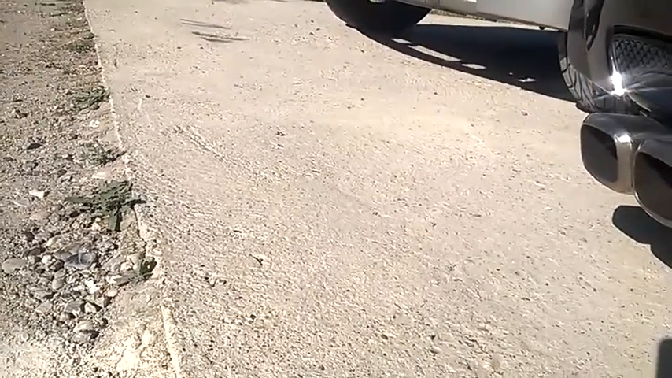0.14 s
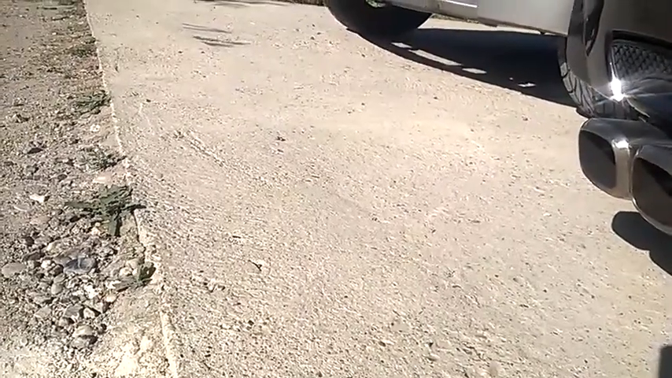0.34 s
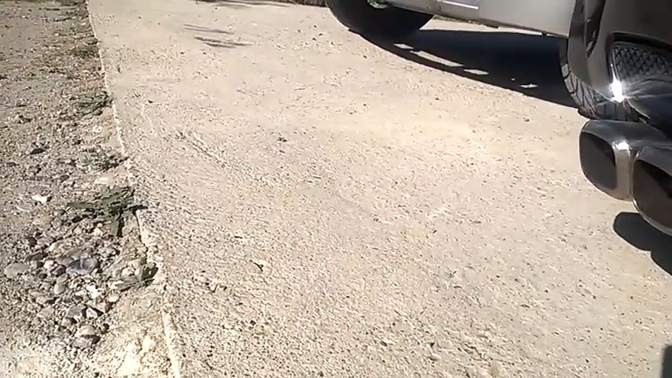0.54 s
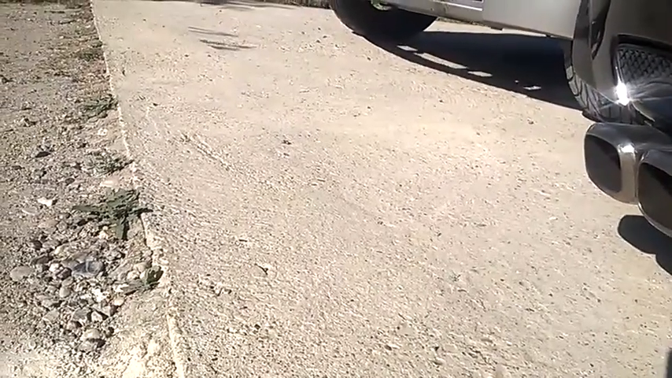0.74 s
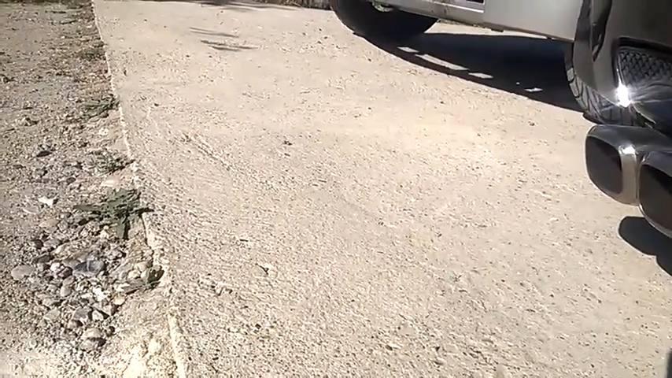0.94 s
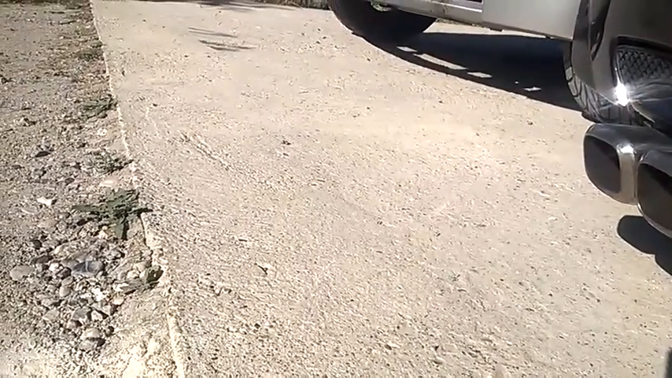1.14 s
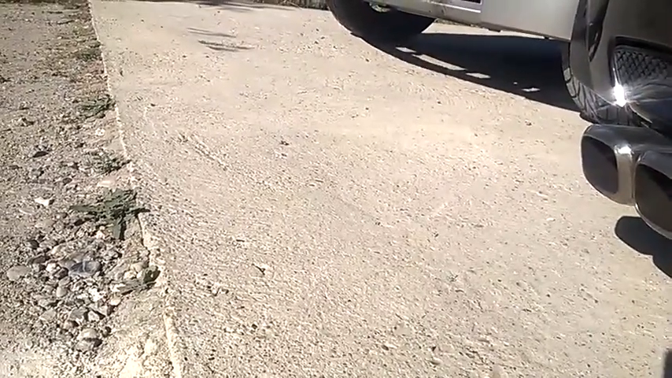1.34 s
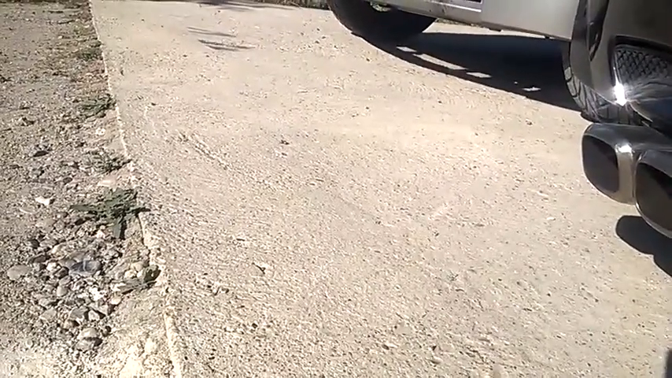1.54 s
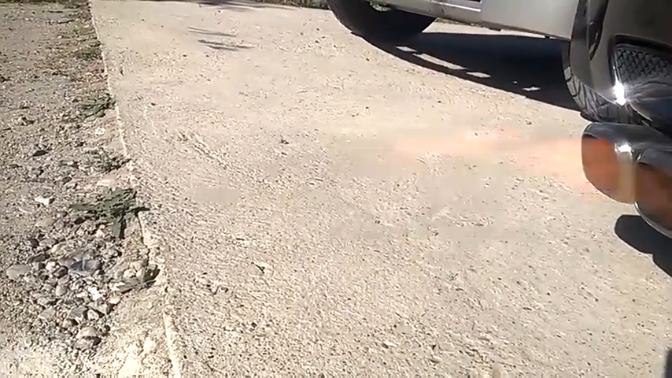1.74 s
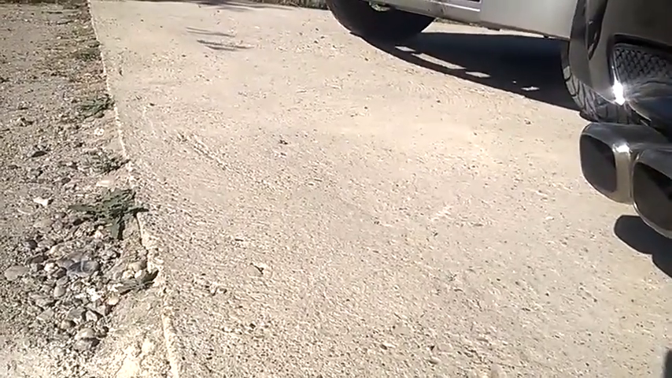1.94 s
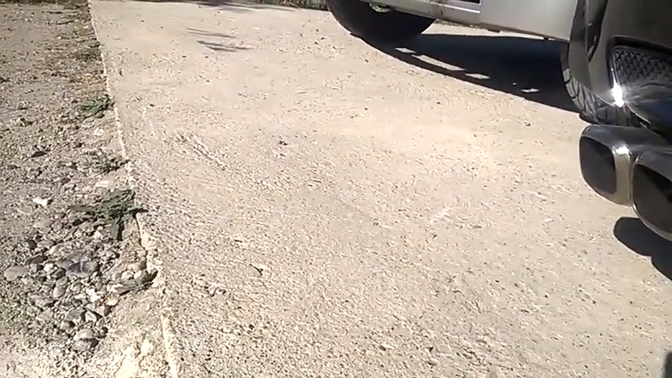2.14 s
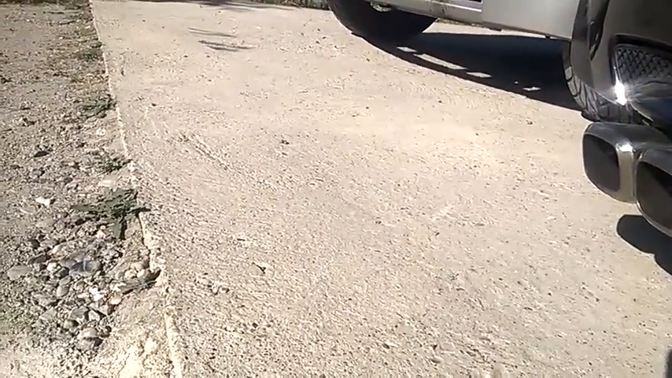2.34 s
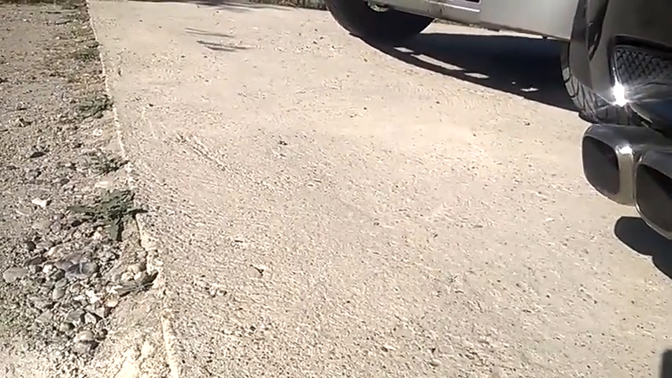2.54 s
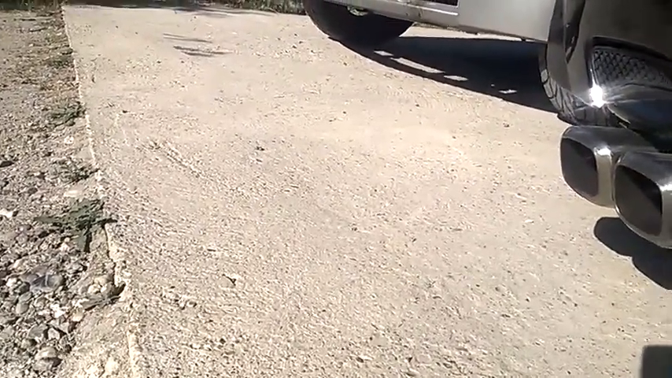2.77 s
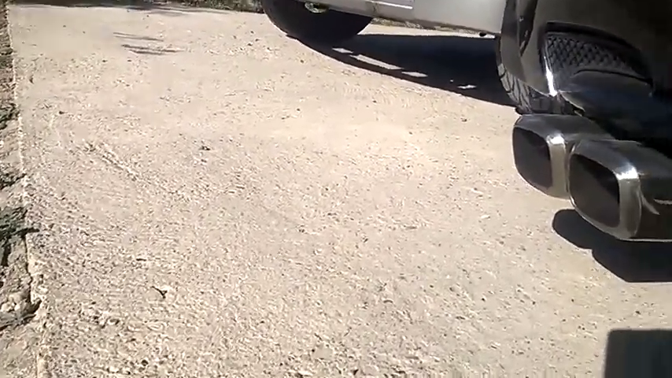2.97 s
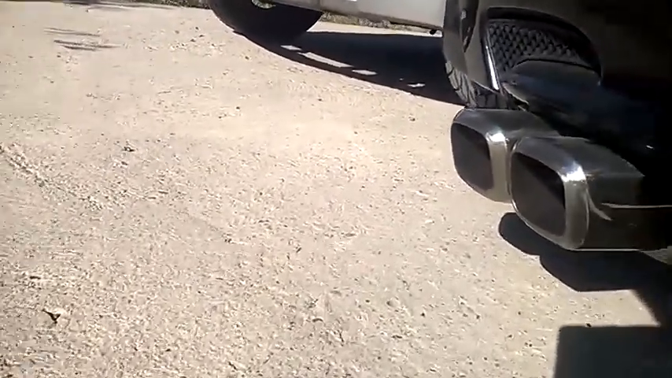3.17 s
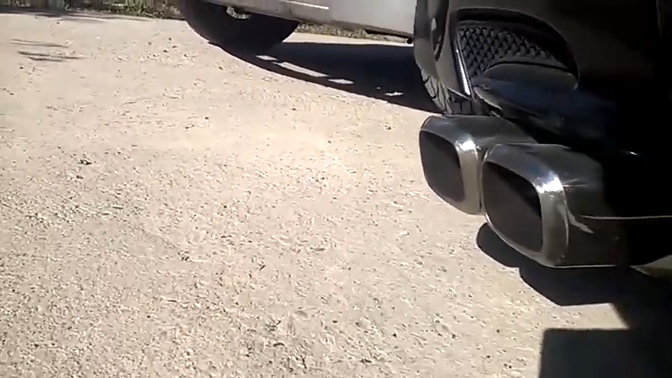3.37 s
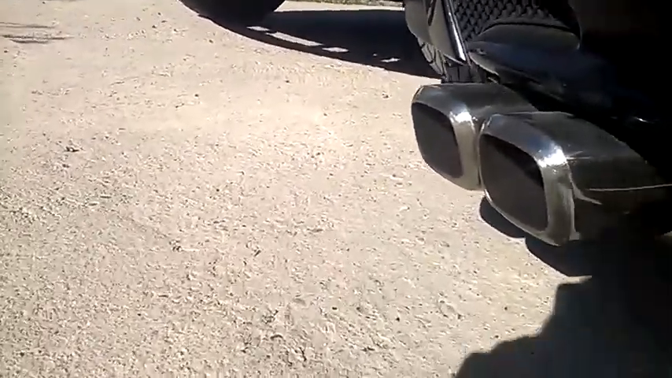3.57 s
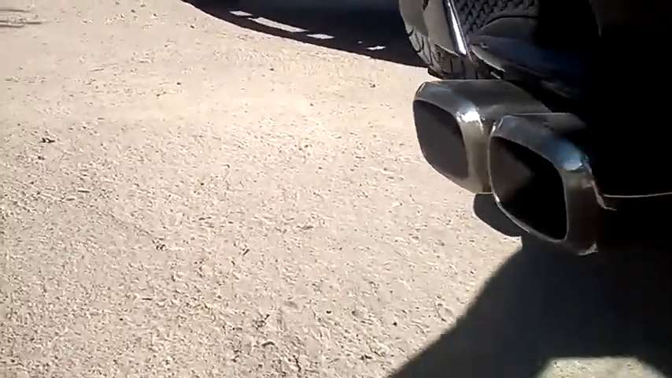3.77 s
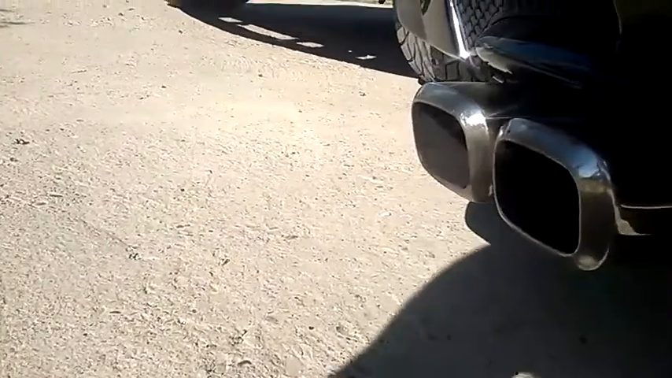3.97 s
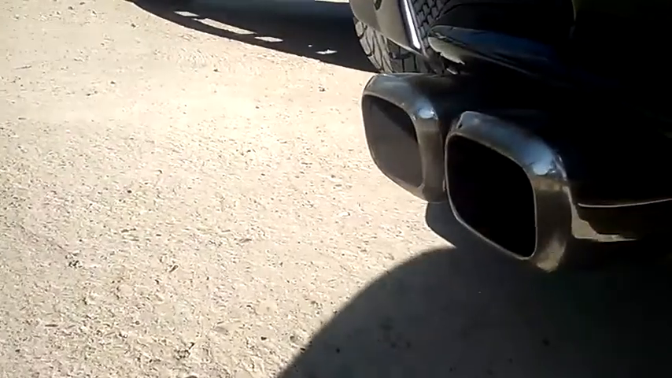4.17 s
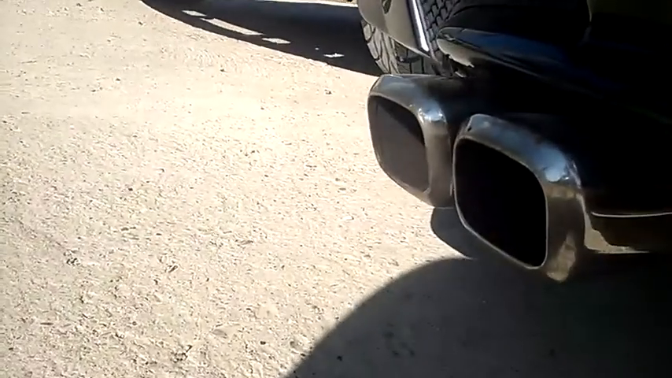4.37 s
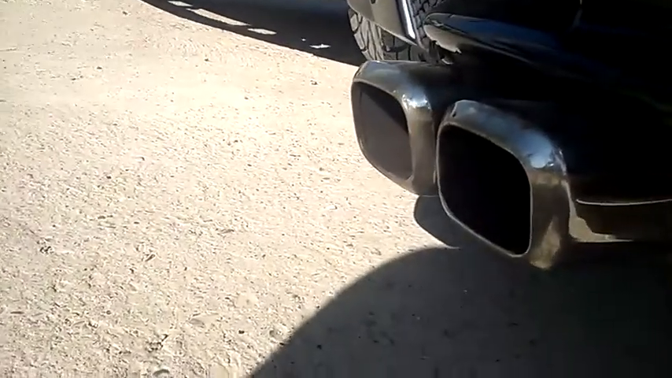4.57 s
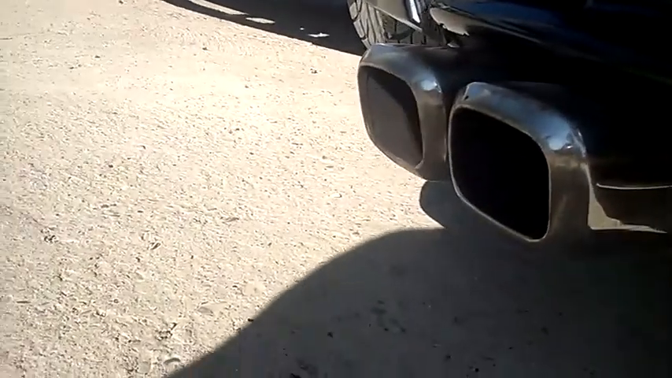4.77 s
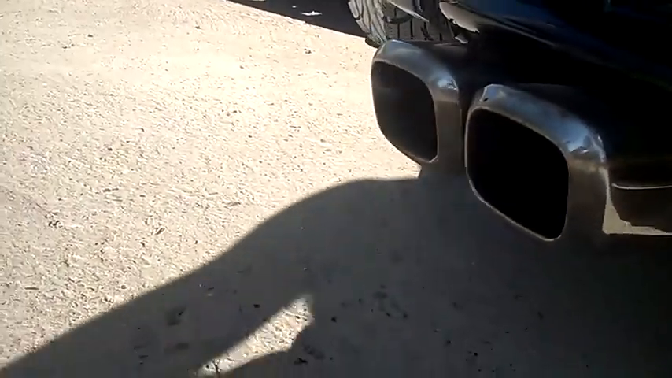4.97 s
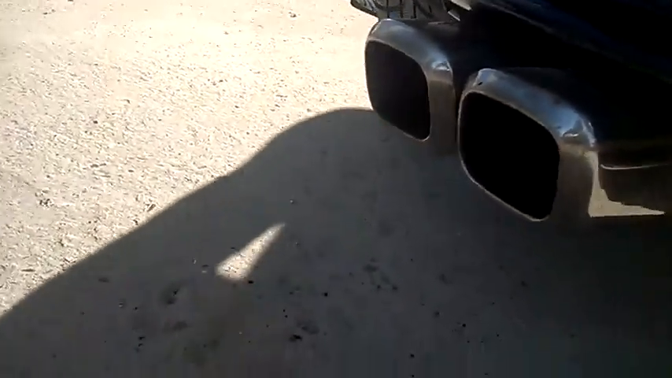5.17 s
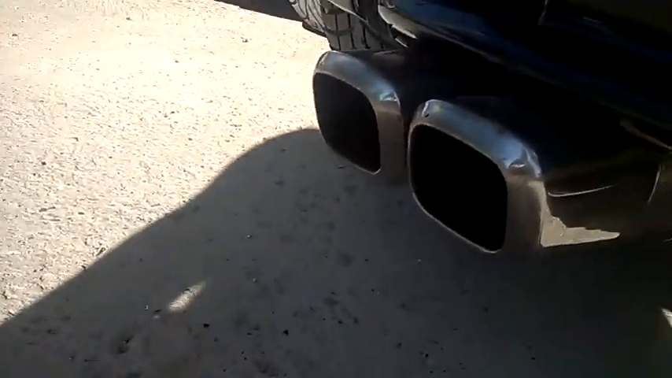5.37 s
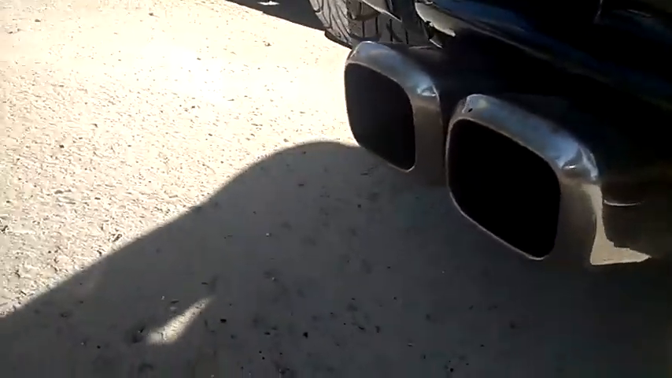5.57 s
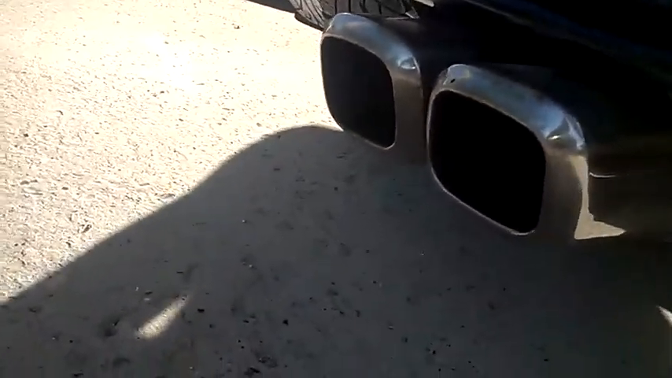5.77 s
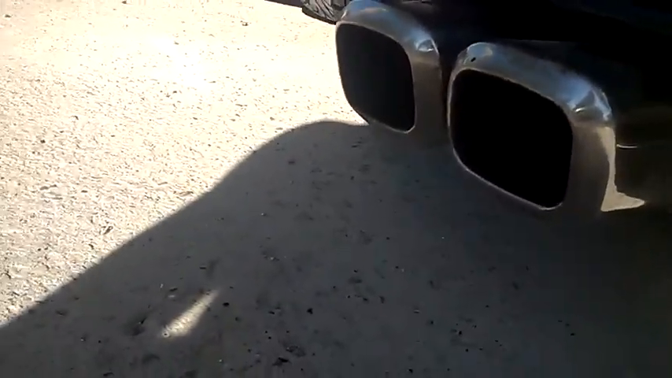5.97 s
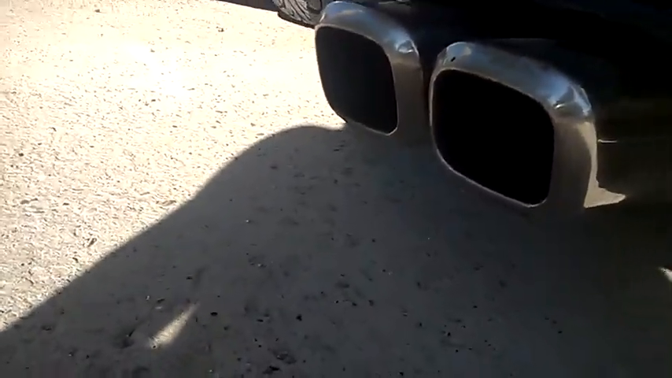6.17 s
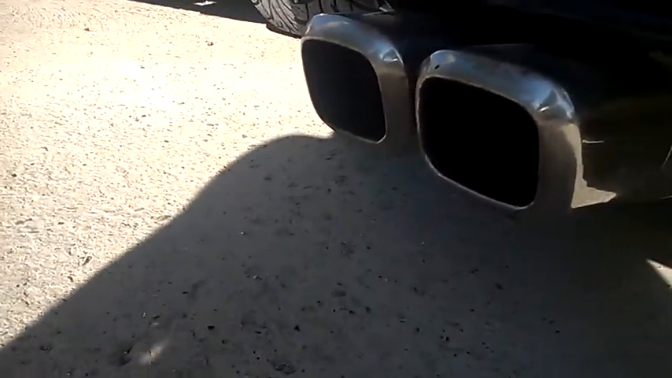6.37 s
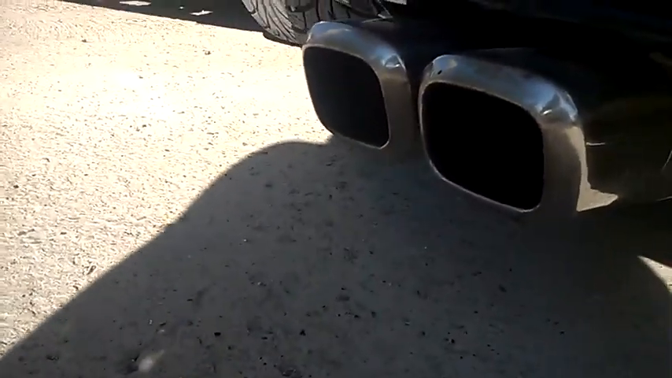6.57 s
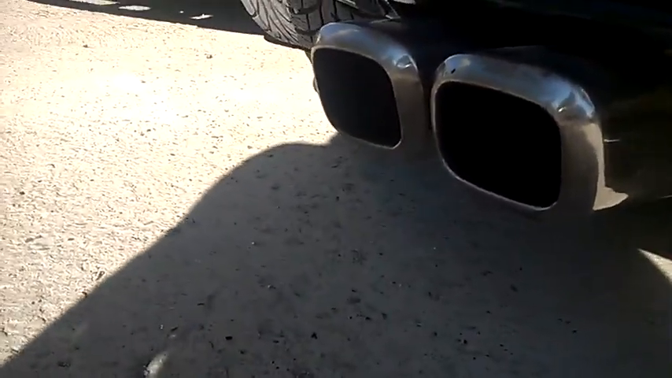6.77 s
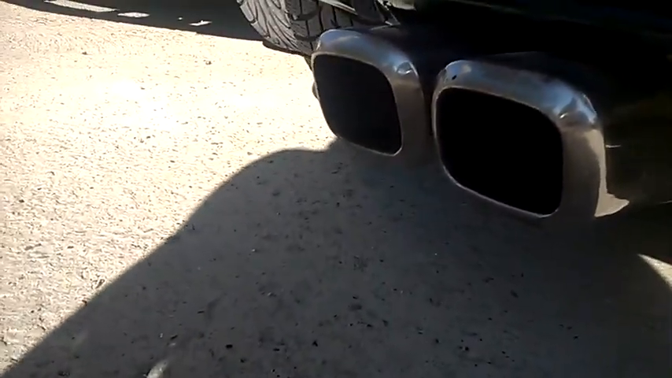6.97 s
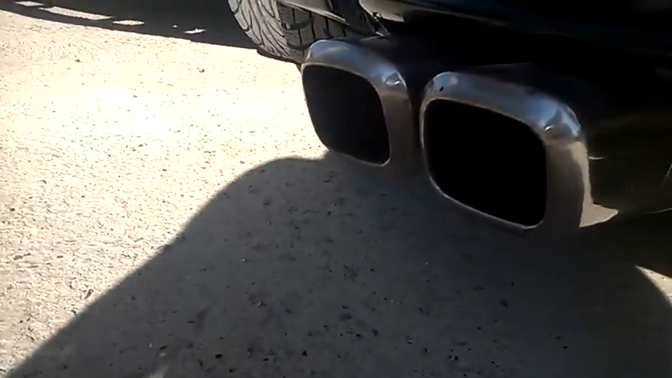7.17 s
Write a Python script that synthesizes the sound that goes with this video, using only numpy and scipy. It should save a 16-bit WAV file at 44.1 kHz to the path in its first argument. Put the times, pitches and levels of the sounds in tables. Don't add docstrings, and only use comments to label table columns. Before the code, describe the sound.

A petrol engine is blipped three times close to its twin tailpipe outdoors, each rev barking, falling away and ending in a sharp backfire pop.

```python
import sys
import numpy as np
from scipy import signal
from scipy.fft import rfft, irfft, next_fast_len
from scipy.io import wavfile
from scipy.ndimage import map_coordinates

SR = 44100
rng = np.random.default_rng(int(sys.argv[2]) if len(sys.argv) > 2 else 0)


def master_out(mix):
    frames = np.transpose(np.atleast_2d(mix))
    ceiling = np.clip(frames, -1, 1)
    pcm = np.round(ceiling * 32767).astype(np.int16)
    wavfile.write(sys.argv[1], SR, pcm)


def makeup_ratio(level_db):
    decades = np.asarray(level_db, float) / 20
    return 10 ** decades


N = 317961
TIME = np.arange(N) / SR

# opens_s, fuel_cut_s
BLIPS = [
    (-.3, .246),
    (2.467, 2.988),
    (4.895, 5.51),
]
# time_s, firing_hz
REVS = [
    [(0, 95.6), (.2, 138.3), (.25, 140.2), (.46, 127.6), (.7, 109.8), (1.04, 86.5), (1.59, 59.52),
     (1.76, 45.7), (2.49, 36.2)],
    [(2.57, 47.9), (2.82, 95.8), (2.97, 130.5), (3.03, 122.9), (3.39, 102.2), (3.63, 85.27), (4.08, 60.5),
     (4.4, 46.34), (4.86, 35.1)],
    [(4.93, 38.61), (5.2, 86.76), (5.39, 133.2), (5.5, 146), (5.7, 135.5), (5.9, 119.7), (6.4, 88.6),
     (6.95, 58.36), (7.15, 47.9)],
]
# combustion_db, idle_firing_db, pumping_db, pipe_snap_db, jet_db
EFFORT = [
    (-.5, -1, -3, 0, -3),
    (-1.1, 3, -0.17, -12, -7),
    (2.5, 2, 1, 1, 0.5),
]
# time_s, strength_db
STRAY_FIRINGS = [(.426, -16.5), (0.456, -18.5), (1.692, -45), (1.769, -32.5), (1.812, -27), (1.935, -35),
                 (2.026, -45.5), (2.122, -39.5), (2.221, -38.5), (2.328, -40.5), (2.435, -39),
                 (3.128, -15.5), (3.163, -18.5), (4.278, -30.5), (4.397, -40), (4.485, -34), (4.575, -36.5),
                 (4.672, -34), (4.77, -35.5), (4.877, -33.5), (4.922, -51), (5.679, -16), (5.710, -15),
                 (7.015, -33), (7.112, -32.5), (7.159, -24)]
FIRST_KICKS = [2.505, 2.551, 2.590, 2.659, 2.741, 4.943, 4.988, 5.009]
OPEN_S, CUT_S = 0.058, 0.041
PLATE_LAG_S, PLATE_S = 0.063, 0.05
PUMP_LEAD_S, PUMP_RISE_S, PUMP_LOADED_DB = 0.076, 0.092, -28.5
FLOW_LEAD_S, FLOW_FALL_S = 0.042, 0.04
SNAP_GAP_S, SNAP_GAP_DB = 0.015, -23.5
STRAY_MUTE_S, STRAY_MUTE_DB = 0.017, -7
GASP_S, GASP_DB = 0.032, 7

# firing_hz, level_db
FIRE_LOADED = [(38, -19), (50, -19), (65, -14.5), (90, -11), (115, -10), (140, -14)]
# firing_hz, level_db
FIRE_IDLE = [(35, -45), (42, -41), (50, -36.5), (58, -33), (66, -40), (140, -50.5)]
# firing_hz, level_db
PUMPING = [(38, -31.5), (47, -23.5), (55, -19), (61, -10.5), (72, -13.5), (88, -12.5), (110, -9),
           (128, -10.5), (142, -5.5)]
# firing_hz, level_db
BAY_COASTING = [(35, -56.5), (45, -53), (60, -50.5), (85, -45), (110, -39.5), (140, -36.5)]
# firing_hz, level_db
BAY_LOADED = [(35, -53), (55, -42), (85, -36.5), (115, -30), (140, -29)]
# firing_hz, level_db
SNAPPING = [(55, -69), (63, -45), (70, -60), (104, -64), (114, -39.5), (121, -21.5), (142, -19)]
# firing_hz, level_db
JET_LOADED = [(38, -56.5), (50, -50.5), (75, -38.5), (100, -21.5), (140, -21.5)]
# firing_hz, level_db
JET_COASTING = [(60, -65), (95, -64), (112, -49.5), (126, -36.5), (142, -38)]

# pitch_hz, level_db per Hz
BAY_HISS = [(350, -9), (600, 2.5), (907, -8.5), (991, -3), (1210, -10), (1310, -4.5), (1520, -7),
            (2500, -8.5), (4080, -18.5), (6100, -13), (8240, -22.5), (12000, -41.5), (15600, -79),
            (22000, -120)]
# start_s, peak_db
TICKS = [(3.70, -29), (3.882, -24), (3.9217, -24), (3.952, -22)]
# pitch_hz, level_db per Hz
TICK_CRACK = [(800, -51), (2000, 23.5), (3500, 4.5), (5800, 16), (10000, -23.0)]

# flame_lights_s, blast_s, blast_ends_s, hearing_returns_s
BACKFIRES = [
    (1.816, 1.8265, 1.839, 1.851),
    (4.280, 4.298, 4.3115, 4.325),
    (7.161, 7.1765, 7.188, 7.197),
]
# flame_db, blast_db, echo_db
BACKFIRE_LEVELS = [
    (-19.5, 4, -10),
    (-15, -5, -15),
    (-15.5, 7.5, -6.5),
]
# pitch_hz, level_db per Hz
BLAST = [(59, -47.5), (100, 1.5), (602, -5.5), (1020, -16), (2640, -22.5), (4770, -37), (10200, -31.5),
         (15600, -39.5)]
# pitch_hz, level_db per Hz
ECHO = [(59, -7.5), (100, 0.5), (166, 10), (467, 5.5), (1180, -7), (2010, -6), (4030, -20.5), (5890, -14.5),
        (15600, -32.5)]
# pitch_hz, fall_s
ECHO_FALL = [(200, 0.22), (2000, 0.26), (8000, 0.22), (15000, 0.061)]
# pitch_hz, level_db
BANG_BODY = [(220, -2), (400, 3), (680, 3), (1000, -2), (1500, 1), (2200, -1)]

# pitch_hz, level_db per Hz
RASP = [(300, -43.5), (700, 1.5), (1250, 1.5), (1600, -1.5), (1950, -5), (2700, -18.5), (6000, -19.5),
        (10000, -21.5), (15600, -27)]
# pitch_hz, level_db
TIP_RING = [(1300, 0), (1480, 8), (1620, 8), (1800, 0)]
# pitch_hz, level_db per Hz
GROWL = [(300, -31.5), (480, 0.5), (620, 1), (850, -5.5), (1200, -14.5), (2000, -40)]
GROWL_DB = -11
GROWL_FROM_HZ, GROWL_OVER_HZ = 45, 40

# pitch_hz, level_db
SNAP_TONE = [(60, -49.5), (200, -24.5), (280, -1.5), (400, -1), (550, -7), (800, -24), (1000, -18),
             (1500, -50), (4000, -100)]
# pitch_hz, level_db
SNAP_EDGE = [(200, -62), (700, -13), (1000, -8.5), (1500, -16), (2200, -43.5), (4000, -61), (8000, -100)]
# time_s, edge_db
NEARNESS = [(0, -16.5), (2.5, -21), (4.5, -6), (7.21, -8)]
# time_s, half_length_s, level_db
RATTLES = [(0.512, 0.033, -20), (1.48, .075, -43), (4.03, .07, -45), (5.777, .04, -16.5), (6.52, .012, -43),
           (6.861, .022, -35)]

# multiple of the firing rate, level_db
PUMP_HARMONICS = [(.5, -46.5), (1, 1.5), (1.5, -13.5), (2, -3), (2.5, -22), (3, -8.5), (3.5, -16.5),
                  (4, -8.5), (4.5, -20.5), (5, -14), (6, -10.5), (7, -44.5), (8, -11.5), (10, -15.5)]
# pitch_hz, level_db per Hz
PUMP_FLOW = [(30, -10.5), (200, 2.5), (600, 2.5), (1500, -12.5)]
# pitch_hz, level_db
COOL_PIPE = [(30, -17.5), (63, -6.5), (75, -2), (90, 1), (110, -5.5), (125, 2.5), (150, -3), (187, -24),
             (240, -6), (340, -13), (390, -6.5), (450, -16), (500, -17.5), (900, -43.5)]

CYLINDERS = [-0.8, -4, -0.39, -3]
# pitch_hz, level_db per Hz
CHURN = [(30, -9.5), (150, 5.0), (600, 7), (1500, -19.5)]
# pitch_hz, level_db
HOT_PIPE = [(20, -37), (60, -1), (80, -1.5), (120, 7), (155, 4.5), (200, -3.5), (265, -2.5), (305, -4),
            (350, -13), (430, -4.5), (500, -12), (570, -11.5), (1000, -32), (3000, -39)]
# pitch_hz, level_db
SOFT_PIPE = [(15, -22), (40, 8), (85, 4.5), (110, -2), (130, 9), (170, -2.5), (200, -11.5), (265, 2.5),
             (330, -16.5), (400, -8), (520, -19), (800, -55), (2000, -100)]
# pitch_hz, level_db
MUFFLER = [(20, 0), (1200, 0), (2500, -10), (4500, -34), (12000, -90)]


def unit(x):
    return x / np.sqrt(np.mean(x ** 2) + 1e-20)


def along(points, at):
    hz, value = np.transpose(points)
    return np.interp(np.log(at + 1), np.log(hz + 1), value)


def curves(rows):
    s, *columns = np.transpose(rows)
    return [np.interp(TIME, s, column) for column in columns]


def coloured(x, points):
    m = 2 * next_fast_len(N // 2 + 8192)
    gain = makeup_ratio(along(points, np.fft.rfftfreq(m, 1 / SR)))
    cepstrum = irfft(np.log(gain + 1e-6), m)
    cepstrum[1:m // 2] *= 2
    cepstrum[m // 2 + 1:] = 0
    return irfft(rfft(x, m) * np.exp(rfft(cepstrum)), m)[:N]


def noise(points):
    return unit(coloured(rng.standard_normal(N), points))


def wobble(rate_hz):
    knots = rng.standard_normal(int(N * rate_hz / SR) + 4)
    return map_coordinates(knots, [TIME * rate_hz])


def ramp(start_s, length_s):
    return np.clip((TIME - start_s) / max(length_s, 1e-3), 0, 1)


def held(lag_s, fall_s):
    return sum(ramp(on, OPEN_S) - ramp(off + lag_s, fall_s) for on, off in BLIPS)


def near(times, width_s):
    return sum(np.exp(-((TIME - s) / width_s) ** 2) for s in times)


def blend(share, on, off):
    return share * on + (1 - share) * off


def crank(speed):
    turns = np.cumsum(speed) / SR
    strays = np.transpose(STRAY_FIRINGS)[0]
    alone = np.diff(strays, prepend=0) > 0.04
    marks = np.sort([*strays[alone], *FIRST_KICKS])
    slip = np.unwrap(np.interp(marks, TIME, turns) % 1, period=1)
    return turns - np.interp(TIME, marks, slip)


def driver():
    speed, = curves(sum(REVS, []))
    fuel = held(-CUT_S / 2, CUT_S)
    hard = held(PLATE_LAG_S, PLATE_S)
    loaded = held(-PUMP_LEAD_S, PUMP_RISE_S)
    flow = held(-FLOW_LEAD_S, FLOW_FALL_S)
    opens, cuts = np.transpose(BLIPS)
    blip = np.maximum(np.searchsorted(opens, TIME) - 1, 0)
    fire, idle, pump, snap, jet = np.transpose(EFFORT)[:, blip]

    fire_db = blend(fuel, along(FIRE_LOADED, speed) + fire, along(FIRE_IDLE, speed) + idle)
    pump_db = along(PUMPING, speed) + pump + PUMP_LOADED_DB * loaded
    coasting_db = along(BAY_COASTING, speed) + GASP_DB * near(opens, GASP_S)
    hiss_db = blend(flow, along(BAY_LOADED, speed), coasting_db)
    jet_db = blend(flow, along(JET_LOADED, speed), along(JET_COASTING, speed)) + jet
    snap_db = along(SNAPPING, speed) + snap + SNAP_GAP_DB * near(cuts - CUT_S / 2, SNAP_GAP_S)
    snap_db += STRAY_MUTE_DB * near([s for s, _ in STRAY_FIRINGS], STRAY_MUTE_S)
    for s, half_s, db in RATTLES:
        snap_db = np.maximum(snap_db, db - 20 * ((TIME - s) / half_s) ** 4)

    uneven_db = (2.5 - 1.3 * hard) * wobble(150)
    return dict(speed=speed, turns=crank(speed), hard=hard, fire_db=fire_db, pump_db=pump_db,
                hiss_db=hiss_db, snap_db=snap_db, jet_db=jet_db, uneven_db=uneven_db)


def train(turns, speed, level_db, jitter, cylinders_db=(0,)):
    pulses = np.zeros(N)
    at = np.flatnonzero(np.diff(np.floor(turns)) > 0)
    late = jitter * rng.standard_normal(1000)[:len(at)] * SR / speed[at]
    place = np.clip(at + late.astype(int), 0, N - 1)
    size = makeup_ratio(level_db[at] + np.resize(cylinders_db, len(at)))
    pulses[place] = size * SR / speed[at]
    return pulses


def soften(pulses, samples):
    hump = np.hanning(samples)
    return np.convolve(pulses, hump / hump.sum(), "same")


def steepen(x, lean_s):
    return np.interp(TIME, np.maximum.accumulate(TIME + lean_s * x), x)


def engine_bay(run):
    clatter = 1 + 0.07 * np.cos(2 * np.pi * run["turns"])
    return makeup_ratio(run["hiss_db"] + 2 + 0.93 * wobble(25)) * clatter * noise(BAY_HISS)


def ticks():
    decays = sum(makeup_ratio(db - 12 - 60 * np.abs(TIME - s) / 0.012) * (TIME > s) for s, db in TICKS)
    return noise(TICK_CRACK) * decays


def backfires():
    flame, blast, out = noise(ECHO), noise(BLAST), np.zeros(N)
    hz, t, grains = signal.stft(noise(ECHO)[:SR], SR, nperseg=256)
    fade_db = -60 * t / along(ECHO_FALL, hz)[:, None]
    for (lit, bang, end, _), (flame_db, blast_db, echo_db) in zip(BACKFIRES, BACKFIRE_LEVELS):
        flare = makeup_ratio(flame_db - 60 * np.abs(TIME - lit) / 0.093)
        out += flare * np.clip((TIME - lit) / 0.0024, 0, 1) * flame
        burst = np.clip(np.minimum((TIME - bang) / 0.004, (end - TIME) / 0.0005), 0, 1)
        out += makeup_ratio(blast_db) * burst * blast
        patches = makeup_ratio(1.5 * rng.standard_normal(len(t)))
        tail = signal.istft(grains * patches * makeup_ratio(echo_db + fade_db), SR, nperseg=256)[1]
        part = out[round(end * SR):][:SR]
        part += tail[:len(part)]
        grains = np.roll(grains, 97, axis=1)
    return coloured(out, BANG_BODY)


def tailpipe_jet(run):
    puff = unit(0.26 + np.sin(np.pi * (run["turns"] + 0.22)) ** 4)
    size = makeup_ratio(2.2 * wobble(120))
    rasp = makeup_ratio(run["jet_db"]) * coloured(puff * size * noise(RASP), TIP_RING)
    grown = run["hard"] * np.clip((run["speed"] - GROWL_FROM_HZ) / GROWL_OVER_HZ, 0, 1)
    growl = grown * makeup_ratio(run["fire_db"] + run["uneven_db"] + GROWL_DB) * puff * noise(GROWL)
    return rasp + growl


def pipe_snap(run):
    snaps = train(run["turns"] - 0.25, run["speed"], run["snap_db"], jitter=0.0018)
    edge = makeup_ratio(curves(NEARNESS)[0]) * coloured(snaps, SNAP_EDGE)
    return -coloured(snaps, SNAP_TONE) - edge


def pumping(run):
    angle = 2 * np.pi * (run["turns"] - 0.03)
    strokes = sum(makeup_ratio(db) * np.cos(k * angle) for k, db in PUMP_HARMONICS)
    gusts_db = 1.5 * wobble(20)
    flow = makeup_ratio(-6.5 + gusts_db) * noise(PUMP_FLOW)
    return 1.228 * coloured(makeup_ratio(run["pump_db"]) * (strokes + flow), COOL_PIPE)


def combustion(run):
    speed, hard = run["speed"], run["hard"]
    pulses = train(run["turns"], speed, run["fire_db"] + run["uneven_db"], 0.012, CYLINDERS)
    lazy = (1 - hard) * np.clip((66 - speed) / 10, 0, 1)
    thuds = makeup_ratio(8.5) * lazy * pulses
    kicks = hard * pulses
    for s, db in STRAY_FIRINGS:
        i = round(s * SR)
        target = thuds if speed[i] < 90 else kicks
        target[i] += makeup_ratio(db + 2.5) * SR / speed[i]

    thuds = soften(thuds, 230)
    churn = noise(CHURN) * makeup_ratio(run["fire_db"])
    sharp = hard * np.clip((speed - 42) / 70, 0, 1)
    kicks = sharp * kicks + soften((1 - sharp) * kicks, 72)
    loaded = coloured(kicks + makeup_ratio(-1) * hard * churn, HOT_PIPE)
    idling = coloured(thuds + makeup_ratio(15.0) * lazy * churn, SOFT_PIPE)
    return -0.7 * (loaded + idling)


def exhaust(run):
    waves = combustion(run) + pumping(run) + pipe_snap(run)
    return coloured(steepen(waves, lean_s=0.00033), MUFFLER)


def scene():
    run = driver()
    return (engine_bay(run) + ticks() + backfires() + tailpipe_jet(run) + exhaust(run))[None]


def low_pass(x):
    return signal.sosfilt(signal.butter(12, 15710, fs=SR, output="sos"), x)


def record(dry):
    top = np.where(dry > 0, 0.56, 0.68)
    x = dry / (1 + np.abs(dry / top) ** 8) ** (1 / 8)
    for _, _, end, back in BACKFIRES:
        deaf = (TIME > end) & (TIME < back)
        sag = 0.25 * np.exp(-np.abs(TIME - end) / 0.005)
        x = np.where(deaf, makeup_ratio(-15) * x - sag, x)
    x = signal.sosfilt(signal.butter(1, 25, "high", fs=SR, output="sos"), x)
    x = signal.sosfilt(signal.cheby1(10, 1, 15700, fs=SR, output="sos"), x)
    x = signal.sosfilt(signal.butter(1, 9000, fs=SR, output="sos"), x)
    return low_pass(x)


dry = scene()
out = record(dry)
master_out(out)
```